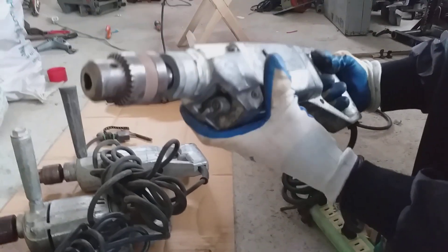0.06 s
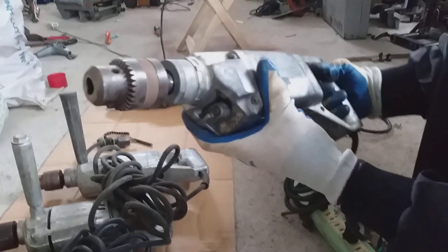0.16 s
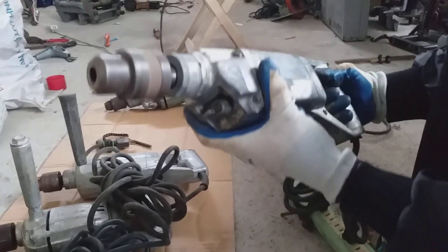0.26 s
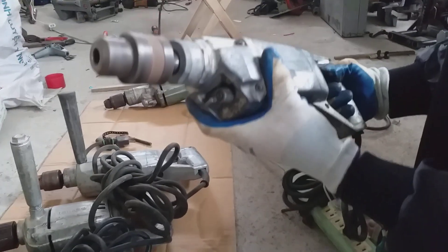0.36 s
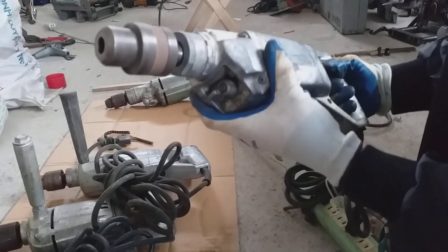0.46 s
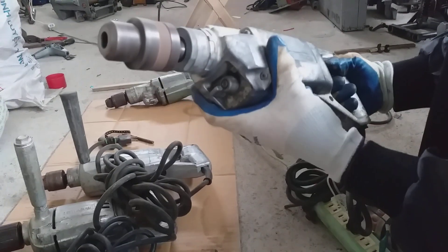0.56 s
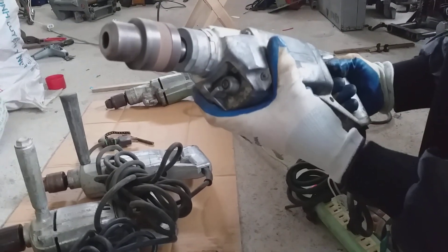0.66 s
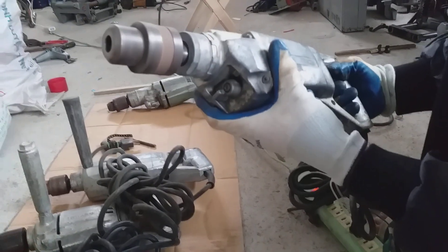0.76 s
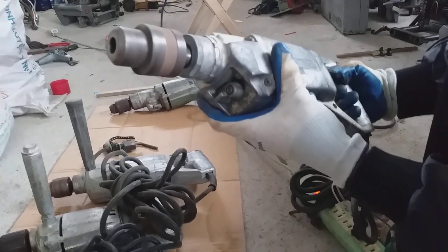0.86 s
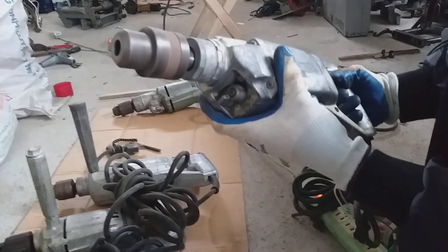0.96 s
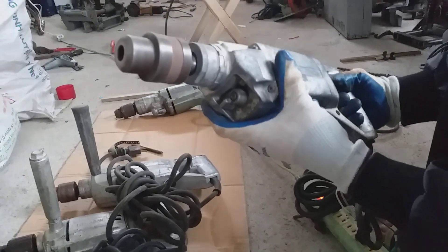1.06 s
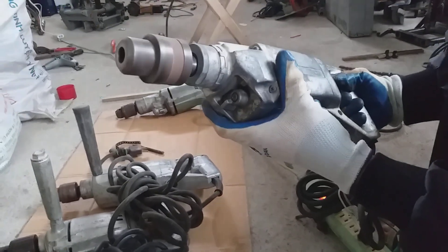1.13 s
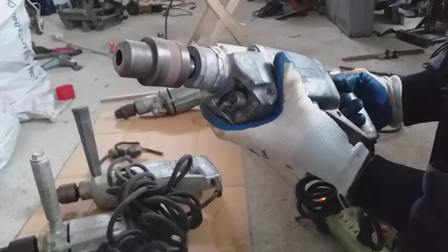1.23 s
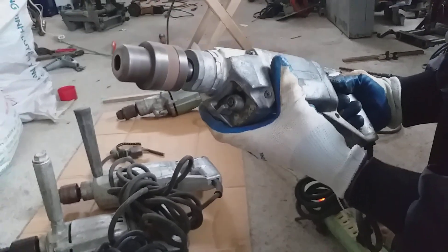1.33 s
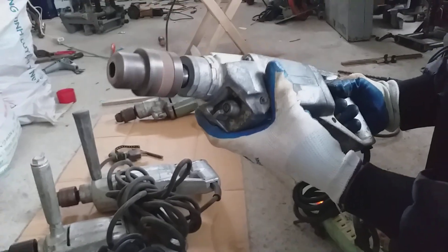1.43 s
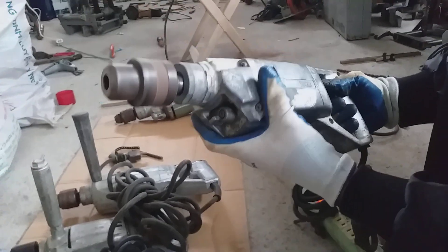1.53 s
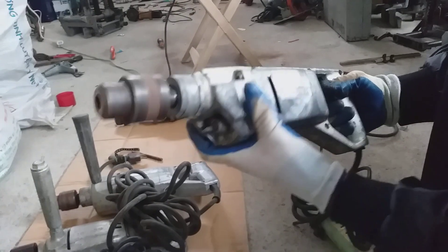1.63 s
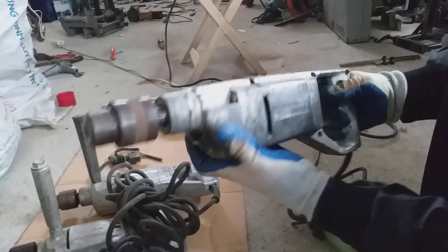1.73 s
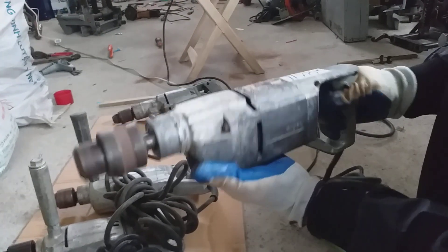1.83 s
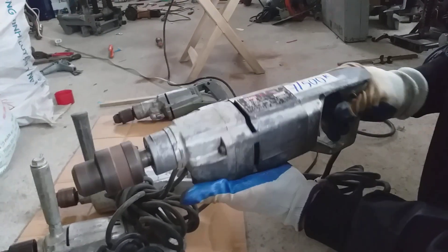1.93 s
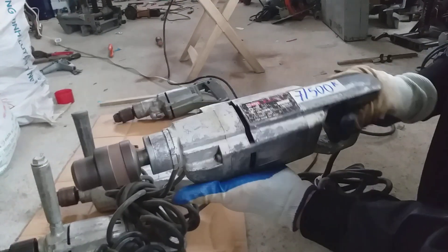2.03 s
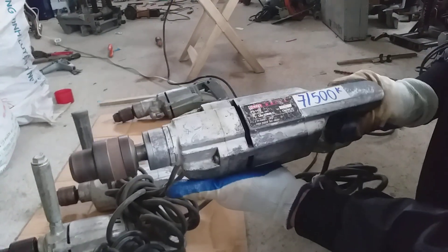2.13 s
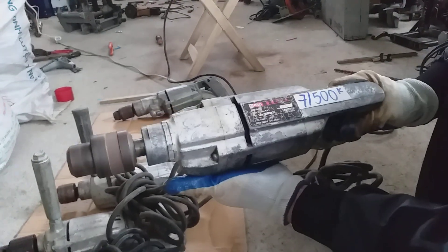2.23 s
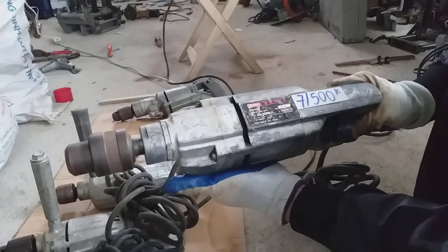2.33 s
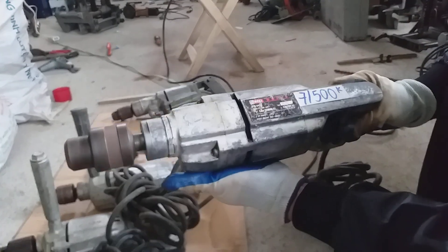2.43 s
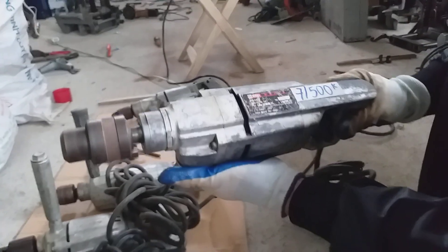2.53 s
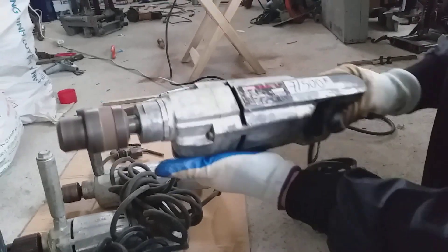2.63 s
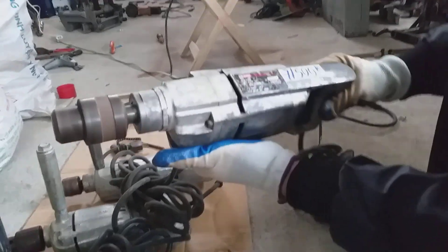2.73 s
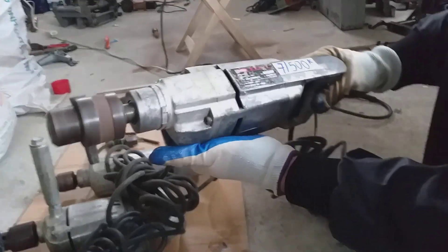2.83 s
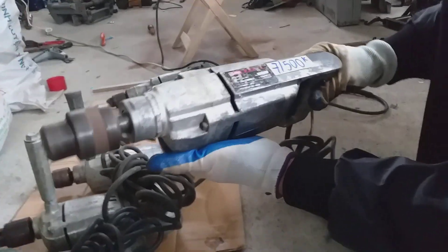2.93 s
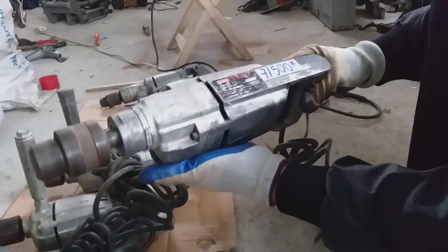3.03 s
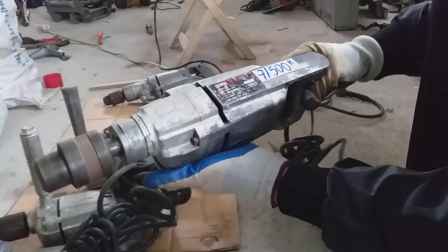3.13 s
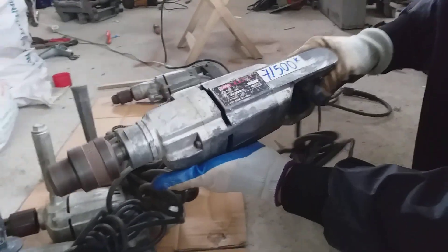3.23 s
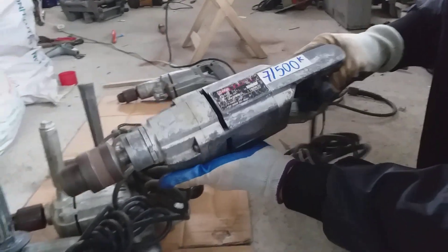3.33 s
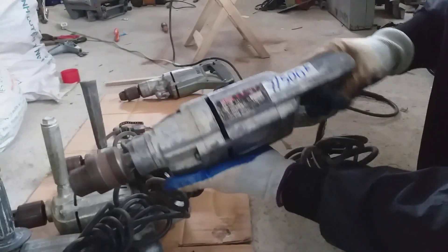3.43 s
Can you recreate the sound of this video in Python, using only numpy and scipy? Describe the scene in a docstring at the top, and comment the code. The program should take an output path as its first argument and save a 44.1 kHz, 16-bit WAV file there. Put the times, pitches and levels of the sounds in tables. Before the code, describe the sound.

An electric drill starts with a trigger snap, races at a steady whine, then is released

```python
"""Corded drill, close up in a workshop

A corded electric drill runs unloaded, close to the microphone. The trigger snaps, brushes hiss and squeal, and the
motor surges on mains current: sines locked to its shaft make the fan's whine, the hum and the armature's tones.
Coloured noise and tooth knocks make rushing air and gear clatter. The drill is turned over in the hands, then
released to coast down. A short room tail, soft handling thuds and a faint floor lie behind it, in mono."""
import sys
import numpy as np
from scipy import signal
from scipy.fft import rfft, irfft, next_fast_len
from scipy.io import wavfile
from scipy.ndimage import uniform_filter1d, minimum_filter1d, map_coordinates

SR = 44100
rng = np.random.default_rng(int(sys.argv[2]) if len(sys.argv) > 2 else 0)


def log_audio(samples):
    """Write samples as a 16-bit WAV file to the path given in sys.argv[1]."""
    # one column per channel
    frames = np.atleast_2d(samples).T
    # limit to full scale, then quantise
    limited = np.clip(frames, -1, 1)
    pcm = np.round(limited * 32767).astype(np.int16)
    wavfile.write(sys.argv[1], SR, pcm)


N = 154350
T = np.arange(N) / SR  # time [s]
MAINS_HZ = 50
BRUSH_CONTACT_S = 0.212  # the brushes begin to carry current


def amp(db):
    """Decibels to amplitude."""
    return 10 ** (np.asarray(db) / 20)


def unit(x):
    """Scale to rms 1."""
    return x / np.sqrt(np.mean(x ** 2) + 1e-20)


def along_frequency(points, hz):
    """Read (frequency [Hz], value) points on a log frequency axis."""
    f, value = np.transpose(points)
    return np.interp(np.log(hz + 1), np.log(f + 1), value)


def along_time(points):
    """Read (time [s], value) points over the whole scene."""
    return np.interp(T, *np.transpose(points))


def ramp(start, length):
    """Rise from 0 to 1 over length seconds."""
    return np.clip((T - start) / length, 0, 1)


def bump(centre, length):
    """A smooth swell around centre, down to 1/e at length seconds either side."""
    return np.exp(-((T - centre) / length) ** 2)


def sine(turns):
    """A sine that completes one cycle per turn."""
    return np.sin(2 * np.pi * turns)


def wobble(rate):
    """A smooth random curve with rate knots a second."""
    return map_coordinates(rng.standard_normal(N // 8), [T * rate + 2], mode="wrap")


def filtered(x, response):
    """Multiply the spectrum of x by a response of frequency."""
    m = next_fast_len(N + SR // 2)
    return irfft(rfft(x, m) * response(np.fft.rfftfreq(m, 1 / SR)), m)[..., :N]


def coloured(x, spectrum, peaks=()):
    """Pass x through a spectrum with resonant humps, at rms 1."""
    def response(f):
        lift_db = sum(db * np.exp(-((f - centre) / width) ** 2) for centre, width, db in peaks)
        return amp(along_frequency(spectrum, f) + lift_db)
    return unit(filtered(x, response))


# soft low thuds of handling: (time [s], half length [s], level [dB])
HANDLING_THUDS = [(0.035, 0.075, -48.5), (0.167, 0.024, -44), (0.25, 0.043, -44), (.5, 0.071, -46),
                  (0.945, 0.048, -36.5), (1.047, 0.023, -40), (1.362, 0.048, -41.5)]
# colour of a thud: (frequency [Hz], relative level [dB per Hz])
THUD_COLOUR = [(25, -20), (55, 1), (90, 8.5), (170, -1.5), (270, -10), (400, -21), (1000, -55)]
# colour of the quiet room: (frequency [Hz], relative level [dB per Hz])
FLOOR_COLOUR = [(15, -39), (25, -15), (118, -7.5), (191, -22), (231, -31), (637, -24), (850, -32),
                (8500, -31.5), (15000, -43)]
FLOOR_DB = -49.5  # before the drill starts


def background():
    """Low noise swells for the thuds, over a room floor that sinks to a quarter as the drill runs up."""
    swell = sum(amp(db) * bump(s, length) for s, length, db in HANDLING_THUDS)
    thuds = swell * coloured(rng.standard_normal(N), THUD_COLOUR)
    floor = amp(FLOOR_DB) * coloured(rng.standard_normal(N), FLOOR_COLOUR)
    return thuds + (1 - 0.75 * ramp(BRUSH_CONTACT_S, 0.98)) * floor


# how fast the workshop dies away: (frequency [Hz], time to fall 60 dB [s])
WORKSHOP_DECAY = [(200, 0.073), (3000, 0.16), (14000, 0.12)]


def workshop(x):
    """A short room tail of decaying noise, whose decay time depends on frequency."""
    hz, t, z = signal.stft(rng.standard_normal(SR // 2), SR, nperseg=256)
    decay_db = -60 * t / along_frequency(WORKSHOP_DECAY, hz)[:, None]
    tail = signal.istft(z * amp(decay_db), SR, nperseg=256)[1]
    return signal.fftconvolve(x, tail / np.linalg.norm(tail))[:N]


CLICK_S, CLICK_DB, CLICK_T60_S = 0.1975, -10.5, 0.0077
# ringing modes of the trigger: (frequency [Hz], peak level [dB], time to fall 60 dB [s])
TRIGGER_MODES = [(3570, -10.5, 0.019), (6300, -14, 0.0092), (980, -30, .03)]


def trigger():
    """The switch snaps shut: a noise crack with a fainter, longer tail, and a short ring of decaying modes."""
    t = np.maximum(T - CLICK_S, 0)
    ring = sum(amp(db - 60 * t / t60) * sine(hz * t) for hz, db, t60 in TRIGGER_MODES)
    fall = amp(CLICK_DB - 60 * t / CLICK_T60_S) + amp(-23.5 - 60 * t / 0.22)
    crack = coloured(rng.standard_normal(N), BRUSH_COLOUR) * fall
    return ramp(CLICK_S, 0.00072) * (ring + crack)


# colour of sparking and scraping brushes, lent to the trigger's crack: (frequency [Hz], relative level [dB per Hz])
BRUSH_COLOUR = [(100, -17.5), (350, -13), (700, -5.5), (1500, -4.5), (2600, -2), (4500, 3.5), (7400, 0),
                (9500, -5), (15700, -3.5)]
BRUSH_DB, BRUSH_FALL_DB = -11.5, 17.5  # at low speed; drop by top speed
BRUSH_BUZZ = 0.47  # depth of the pulsing at standstill
# brush squeal at the first turns: (frequency [Hz], peak level before doubling [dB])
SQUEAL_TONES = [(2550, -28.5), (3300, -21), (12040, -29)]
SQUEAL_S, SQUEAL_HALF_LENGTH_S = 0.23, 0.013


def brushes(speed, power):
    """Sparks hiss in step with the current, twice per mains cycle; the commutator's first turns make a squeal."""
    buzz = 1 + BRUSH_BUZZ * (1 - speed) * np.cos(4 * np.pi * MAINS_HZ * T)
    sparks = coloured(rng.standard_normal(N) * amp(1.9 * wobble(1500)) * buzz, BRUSH_COLOUR)
    level_db = BRUSH_DB - BRUSH_FALL_DB * speed ** 5 - 6 * (1 - ramp(0.21, 0.07))
    squeal = sum(amp(db) * np.sin(2 * np.pi * hz * T + 0.76 * wobble(297)) for hz, db in SQUEAL_TONES)
    return power * amp(level_db) * sparks + 2 * squeal * bump(SQUEAL_S, SQUEAL_HALF_LENGTH_S)


GROWL_S, GROWL_HALF_LENGTH_S, GROWL_DB = 0.282, 0.011, -25
GROWL_HZ, GROWL_HALF_WIDTH_HZ = 950, 200


def growl():
    """The gears take up the starting torque with a short, low rasp of band noise."""
    noise = rng.standard_normal(N)
    rasp = unit(filtered(noise, lambda f: np.exp(-((f - GROWL_HZ) / GROWL_HALF_WIDTH_HZ) ** 2)))
    return amp(GROWL_DB) * bump(GROWL_S, GROWL_HALF_LENGTH_S) * rasp


SPIN_S, RELEASE_S = 0.188, 2.385  # the shaft starts; power off
TOP_SPEED_HZ = 380.6  # shaft turns per second
SURGE_S, SETTLE_S, SURGE_SHARE = 0.089, 0.344, 0.572  # fast and slow time constants; share of the fast one
BEARING_S, FAN_DRAG = 3.226, 0.61  # coasting time constant; air drag over bearing drag


def motor():
    """The shaft surges, settles and coasts against bearing and air drag: share of top speed, power, turns."""
    on = np.clip(T, SPIN_S, RELEASE_S) - SPIN_S
    off = np.maximum(T - RELEASE_S, 0)
    run_up = 1 - SURGE_SHARE * np.exp(-on / SURGE_S) - (1 - SURGE_SHARE) * np.exp(-on / SETTLE_S)
    coast = np.exp(-off / BEARING_S)
    speed = np.maximum(run_up * coast / (1 + FAN_DRAG * (1 - coast)), 0)
    power = ramp(BRUSH_CONTACT_S, 0.01) * (1 - ramp(RELEASE_S, 0.025))
    turns = np.cumsum(TOP_SPEED_HZ * speed * (1 + 0.0003 * wobble(25))) / SR
    return speed, power, turns


# tones of armature slots and commutator bars:
# (multiple of shaft speed, time when loudest [s], swell [s], fade [s], level before the throb [dB])
ARMATURE_TONES = [(14, .335, .045, .07, -18), (14, .46, .05, .06, -17.5), (14, .69, .05, .2, -23.5),
                  (28, .28, .036, .022, -15.5), (42, .45, .06, .2, -35), (56, .35, .05, .1, -30)]
THROB = 1.2  # depth of the mains pulsing at low speed
TOP_NOTE_DB = -40


def armature(speed, power, turns):
    """Magnetic tones swell and fade in the run-up, throbbing with the mains; the commutator adds a thin top note."""
    mains = 2 * np.pi * MAINS_HZ * T
    throb = 1 + THROB * (1 - speed ** 10) * np.cos(2 * mains) + (1 - speed) * np.cos(mains)
    tones = np.zeros(N)
    for multiple, peak, swell, fade, db in ARMATURE_TONES:
        rise = np.exp(-(np.minimum(T - peak, 0) / swell) ** 2)
        fall = np.exp(-np.maximum(T - peak, 0) / fade)
        level = amp(db + 2 * wobble(30))
        tones += rise * fall * level * np.sin(2 * np.pi * multiple * turns + 0.5 * wobble(90))
    top_note = amp(TOP_NOTE_DB + 5 * wobble(14)) * ramp(0.25, 0.1) * sine(56 * turns)
    return np.sqrt(2) * (tones * power * throb + top_note)


# rushing air and gear clatter in the housing: (frequency [Hz], relative level [dB per Hz])
HOUSING_COLOUR = [(40, -48), (120, -28.5), (250, -22), (420, -18), (650, -9.5), (1000, -8), (2000, -4.5),
                  (3100, -2.5), (4000, 0.5), (5000, 2), (6200, -0.5), (7500, -1.5), (9400, -0.5),
                  (12100, 2), (15700, -4.5)]
# resonances heard from the side: (frequency [Hz], half width [Hz], lift [dB])
SIDE_PEAKS = [(910, 560, 1.5), (1630, 140, 4), (2466, 280, 7), (4000, 480, 4.5), (7060, 610, 5)]
# resonances with the drill turned over: (frequency [Hz], half width [Hz], lift [dB])
TURNED_PEAKS = [(1280, 213, 6.1), (2110, 230, 1.5), (5370, 280, 4.4), (6920, 470, 2.2), (12200, 250, 1.5)]
TURN_S, TURN_LENGTH_S = 1.76, 0.46  # middle and length of the turn
# level of the rushing noise, strong at start-up, easing, dipping while the whine is loudest:
# (time [s], level [dB])
RUSH_LEVEL = [(.25, 7.5), (.45, 6.5), (.8, 3.5), (1.3, 1.5), (1.68, 1.5), (1.83, -1), (2, 0.5), (2.45, 1.5),
              (2.6, 2), (2.95, 1), (3.1, 1.5), (3.5, 3)]
PINION_TEETH, KNOCK_S, CLATTER_DB = 5, 0.00026, -6  # knock decay time; knocks against air noise
GEAR_HZ, GEAR_DB_PER_DECADE = 2040, 23  # the low gear noise depends less on speed
RUSH_DB, RUSH_DB_PER_DECADE = -15, 47.5  # overall; per tenfold speed
FIZZ_HZ, FIZZ_SHARE = 8600, 0.26  # the top fizz shares only a quarter of the rush's level changes


def air_and_gears(speed, turns):
    """Air noise and uneven tooth knocks ring the housing, whose colour changes as it is turned."""
    teeth = np.diff(np.floor(PINION_TEETH * turns), prepend=0)
    impacts = teeth * rng.random(N)
    knock_envelope = signal.lfilter([1], [1, -np.exp(-1 / (KNOCK_S * SR))], impacts)
    knocks = unit(knock_envelope * rng.standard_normal(N))
    air_noise = rng.standard_normal(N)
    unsteady = amp(0.8 * wobble(60) + 0.071 * wobble(9.1))
    drive = (air_noise + amp(CLATTER_DB) * knocks) * unsteady

    turned = ramp(TURN_S - TURN_LENGTH_S / 2, TURN_LENGTH_S)
    from_side = coloured(drive, HOUSING_COLOUR, SIDE_PEAKS)
    turned_over = coloured(drive, HOUSING_COLOUR, TURNED_PEAKS)
    body = (1 - turned) * from_side + turned * turned_over
    low = filtered(body, lambda f: 1 / (1 + (f / GEAR_HZ) ** 4))
    top = filtered(body, lambda f: f > FIZZ_HZ)
    middle = body - low - top

    decades = np.log10(speed + 1e-3)
    level_db = along_time(RUSH_LEVEL)
    gears = amp(GEAR_DB_PER_DECADE * decades + 1.12 * level_db) * low
    air = amp(level_db) * middle + amp(FIZZ_SHARE * level_db) * top
    air *= amp(RUSH_DB_PER_DECADE * decades)
    return amp(RUSH_DB) * ramp(BRUSH_CONTACT_S, 0.025) * (gears + air)


# the fan's whine as it reaches the microphone: (time [s], level [dB])
WHINE = [(0.27, -23), (0.32, -17), (0.36, -27), (0.41, -21), (0.45, -18), (0.61, -14), (0.86, -10),
         (0.98, -12.5), (1.1, -7.5), (1.38, -12), (1.53, -15.5), (1.68, -14.5), (1.8, -7), (1.87, -6.5),
         (2.16, -17), (2.415, -19), (2.455, -38), (2.5, -21), (2.62, -18), (2.66, -22.5), (2.75, -18),
         (2.82, -21), (2.875, -32), (2.93, -23), (2.99, -35.5), (3.1, -23.5), (3.21, -21.5), (3.31, -29.5),
         (3.4, -24.5), (3.49, -30.5)]
# its overtones, swelling and sinking as pitch and angle change: (time [s], level [dB])
SECOND = [(0.39, -29), (0.44, -20), (0.52, -16), (0.62, -26), (0.8, -21), (1.3, -23), (1.45, -31),
          (1.9, -26), (2.3, -33), (2.73, -24), (2.82, -27), (2.88, -37), (3.45, -45)]
THIRD = [(0.3, -23), (0.36, -36), (0.7, -28), (1, -38), (1.78, -23.5), (1.88, -33), (1.98, -22),
         (2.08, -40), (2.2, -23.5), (2.48, -28), (2.6, -21), (2.85, -34), (2.98, -25), (3.25, -38),
         (3.45, -33)]
FOURTH = [(0.3, -38), (0.5, -31), (2.72, -28), (2.87, -38), (3.1, -28), (3.19, -46), (3.4, -32)]
# hum of the spinning armature's imbalance: (time [s], level [dB])
HUM = [(.25, -50), (.4, -43), (.8, -48), (1.7, -48), (1.9, -54), (2.3, -51), (3.5, -56)]
BLADES = 12
FLUTTER_DB = 6.5  # scale of the random flutter at standstill


def fan(speed, turns):
    """Blades passing sound a tone and overtones, fluttering more below top speed, over the hum of the shaft."""
    out = np.zeros(N)
    flutter_db = FLUTTER_DB * (1 - speed) * wobble(170)
    for k, curve in enumerate([WHINE, SECOND, THIRD, FOURTH], 1):
        level_db = along_time(curve) + k * (0.45 * wobble(22) + 0.4 * wobble(150))
        out += amp(level_db + flutter_db) * sine(k * BLADES * turns)
    out += amp(along_time(HUM) + wobble(11)) * sine(turns)
    return np.sqrt(2) * ramp(0.24, 0.043) * out  # sqrt(2): the levels are rms


ROOM_DB = -13.5


def scene():
    """The drill in its workshop, the same in both channels; fan and background stay out of the room tail."""
    speed, power, turns = motor()
    rough = air_and_gears(speed, turns) + brushes(speed, power) + trigger()
    rough += armature(speed, power, turns) + growl()
    mono = rough + amp(ROOM_DB) * workshop(rough) + fan(speed, turns) + background()
    return np.array([mono, mono])


# response of the microphone: (frequency [Hz], gain [dB])
MICROPHONE = [(28, -14), (70, 0), (7500, 1.5), (8000, -5), (8600, -13), (15000, -9.5)]
CEILING = 0.96  # limiter ceiling, of full scale
CUTOFF_HZ = 15850


def record(dry):
    """A microphone with a dull top, then a fast limiter and a band limit."""
    x = filtered(dry, lambda f: amp(along_frequency(MICROPHONE, f)))
    need = np.minimum(1, CEILING / (np.abs(x).max(axis=0) + 1e-9))
    gain = uniform_filter1d(minimum_filter1d(need, size=300), size=200)  # window sizes in samples
    return filtered(x * gain, lambda f: f < CUTOFF_HZ)


dry = scene()
out = record(dry)
log_audio(out)
```